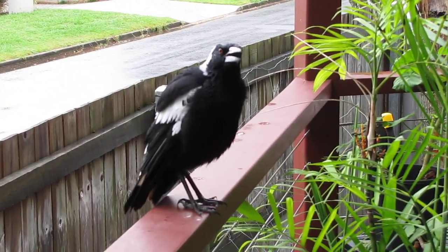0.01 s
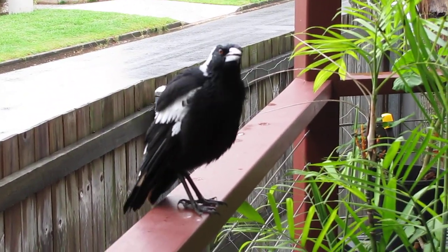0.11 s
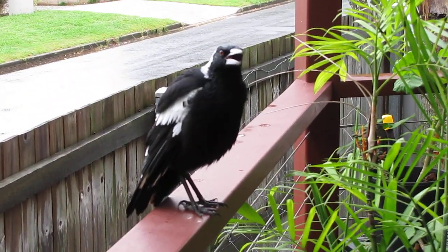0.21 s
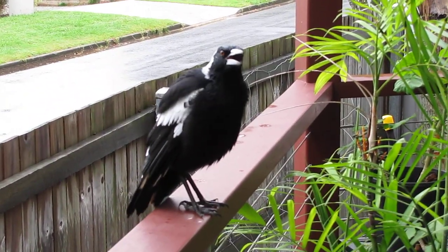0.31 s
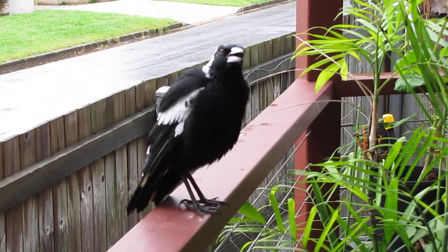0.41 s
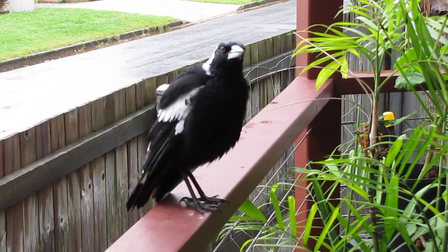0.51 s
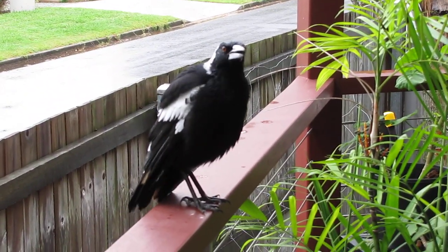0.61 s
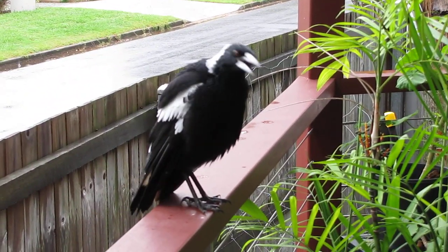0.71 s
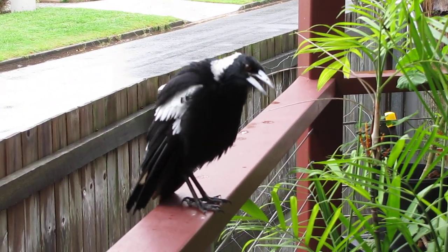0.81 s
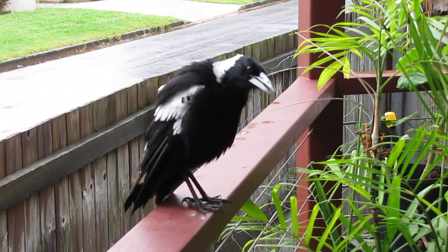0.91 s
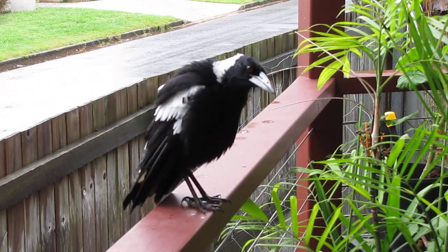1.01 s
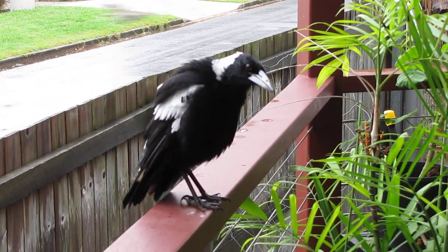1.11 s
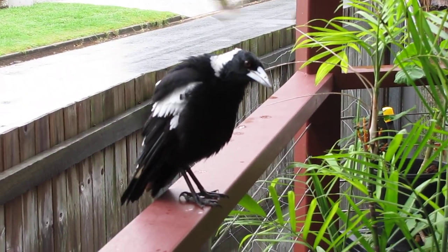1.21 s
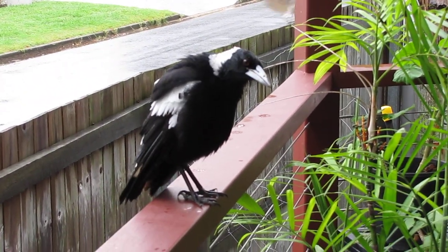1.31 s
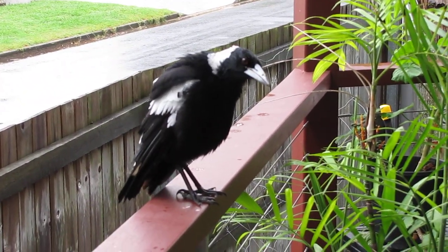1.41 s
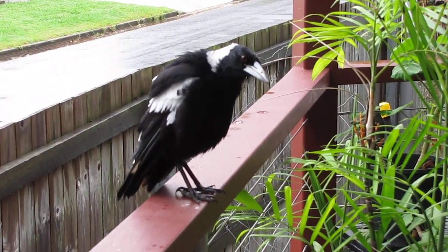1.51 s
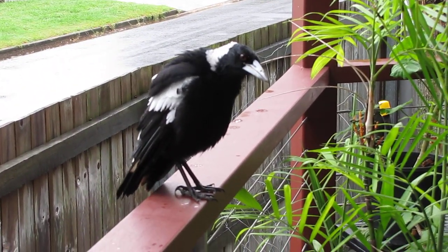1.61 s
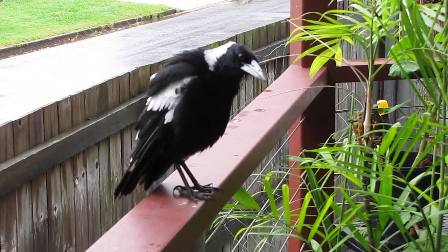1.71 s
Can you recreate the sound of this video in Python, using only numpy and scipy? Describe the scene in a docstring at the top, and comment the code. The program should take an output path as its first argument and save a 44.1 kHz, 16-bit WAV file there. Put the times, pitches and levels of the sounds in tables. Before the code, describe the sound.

Close stereo pickup outdoors on a rainy veranda: a magpie's squawk breaks off, two strong raspy falling cries follow, then small upward chirps through a nearly closed beak, while drips tick and tap and a faint wet hiss continues.

```python
"""A magpie on a veranda rail, close by. First a harsh squawk dies away: an unsteady voice in a narrow throat.
Then two loud falling calls, each opening with a creak; harmonics slide through throat resonances, with rasp.
Last come four soft rising chirps, coloured by the nearly closed beak. Drips, as decaying noise bursts,
tick and tap over the filtered-noise hush of a wet street; veranda and fence answer with echoes and a tail."""
import sys
import numpy as np
from scipy import signal
from scipy.fft import rfft, irfft, next_fast_len
from scipy.io import wavfile
from scipy.ndimage import map_coordinates

SR = 44100
rng = np.random.default_rng(int(sys.argv[2]) if len(sys.argv) > 2 else 0)


def inscribe(sig):
    """Save sig as 16-bit PCM at rate SR to the path in sys.argv[1].

    A 1-D sig is mono; a 2-D sig holds one channel per row.
    Samples are clipped to [-1, 1] before scaling.
    """
    pcm = np.round(np.clip(np.atleast_2d(sig).T, -1, 1) * 32767)
    wavfile.write(sys.argv[1], SR, pcm.astype(np.int16))


N = 79380
LEAD_IN = SR // 5  # samples computed before time 0, so that the squawk and its echoes already sound there
T = np.arange(-LEAD_IN, N) / SR  # s
TOP_HZ = 15750
ATTACK_S, RELEASE_S = 0.0014, 0.01
FLUTTER_HZ, OWN_FLUTTER_DB = 219.9, 4  # rate and depth of the voice's level flutter


def amp(db):
    """Level definition: decibels to an amplitude gain."""
    return 10 ** (np.asarray(db) / 20)


def unit(x):
    """Normalisation: scaled to rms 1."""
    return x / np.sqrt(np.mean(x ** 2) + 1e-20)


def along(points, hz):
    """Logarithmic frequency scale: (Hz, value) points joined by lines."""
    f, v = np.transpose(points)
    return np.interp(np.log(hz + 1), np.log(f + 1), v)


def curves(rows):
    """Linear interpolation: one value per sample for each column after the time."""
    s, *columns = np.transpose(rows)
    return [np.interp(T, s, column) for column in columns]


def wobble(rate):
    """Band-limited fluctuation: a smooth random curve with rate knots a second."""
    knots = rng.standard_normal(len(T) // 8)
    return map_coordinates(knots, [(T - T[0]) * rate], mode="wrap")


def filtered(x, response):
    """Linear filtering: the spectrum times a response of frequency."""
    m = next_fast_len(len(T) + SR // 4)
    hz = np.fft.rfftfreq(m, 1 / SR)
    return irfft(rfft(x, m) * response(hz), m)[..., :len(T)]


def noise(colour):
    """Spectral shaping: coloured noise of rms 1."""
    return unit(filtered(rng.standard_normal(len(T)), lambda hz: amp(along(colour, hz))))


def gate(start, end, release_s=RELEASE_S, attack_s=ATTACK_S):
    """Amplitude envelope: Gaussian flanks before the start and after the end, steady between."""
    before = np.maximum(start - T, 0) / attack_s
    after = np.maximum(T - end, 0) / release_s
    return np.exp(-before ** 2 - after ** 2)


def partial(pitch, k):
    """Phase as the integral of frequency: harmonic k of a moving pitch, rms 1, silent above SR / 2."""
    phase = 2 * np.pi * k * np.cumsum(pitch) / SR
    return np.sqrt(2) * np.sin(phase) * (k * pitch < SR / 2)


def overtones(pitch, throat, flutter_db, orders):
    """Source-filter principle: harmonics slide through fixed resonances, at rms 1 before each flutters."""
    gains = np.array([amp(along(throat, k * pitch)) for k in orders])
    gains /= np.linalg.norm(gains, axis=0)
    return sum(g * amp(flutter_db * wobble(FLUTTER_HZ)) * partial(pitch, k) for g, k in zip(gains, orders))


# the two falling calls, before jitter and flutter:
# t/s, f/Hz, fundamental level/dB, second harmonic level/dB, higher overtones level/dB
CALL_CURVES = [
    [(0.172, 2425, -29, -47, -47), (0.18, 2432, -24, -36.5, -42), (0.196, 2362, -26.5, -31.5, -50),
     (0.204, 2404, -25.5, -35.5, -40), (0.238, 2400, -15, -24, -41.5), (0.258, 2325, -13.5, -20, -31.5),
     (0.284, 2304, -10.5, -23, -33.5), (0.322, 2247, -10, -33, -28.5), (0.36, 2140, -14, -27.5, -27),
     (0.376, 2107, -24, -44, -22), (0.39, 2024, -11, -40, -19), (0.42, 1950, -12, -35.5, -27.5),
     (0.43, 1919, -17.5, -53, -32)],
    [(0.628, 2342, -44, -45, -55), (0.632, 2381, -31.5, -47, -56), (0.672, 2322, -22, -28.5, -41.5),
     (0.736, 2243, -14, -32.5, -32.5), (0.752, 2226, -12, -40.5, -35.5), (0.762, 2163, -14, -29.5, -25.5),
     (0.8, 2110, -19.5, -27, -29.5), (0.828, 1981, -18.5, -41, -26), (0.846, 2018, -14.5, -34.5, -28),
     (0.88, 1977, -16.5, -44, -26), (0.888, 1961, -7.5, -38, -30), (0.9, 1924, -10, -36.5, -25),
     (0.912, 1855, -20.5, -40, -31)],
]
# state of the voice: t/s, breathy rasp level/dB, roughness/(0-1)
VOICE = [(.17, -50, 0.15), (.21, -43.5, 0.37), (.245, -47, 0.09), (.31, -42.5, 0.13), (.335, -52, 0.06),
         (.37, -44.5, 0.38), (.43, -60, 0.2), (.63, -59.5, 0.42), (.655, -42.5, 0.28), (.69, -59.5, 0.2),
         (.75, -50, 0.2), (.765, -47.5, 0.39), (.80, -52, 0.32), (.82, -48.5, 0.64), (.85, -50, 0.48),
         (.885, -52, 0), (.915, -71, 0.26)]
# throat and open beak, as they colour the higher overtones: f/Hz, relative level/dB
THROAT = [(5300, 4), (5700, 6.5), (6100, 6), (6500, 1), (7000, -3.5), (7600, -9.5), (8500, -8.5),
          (9500, -16.5), (11000, -14), (12000, -15.5), (13500, -20.5), (15500, -29)]
# colour of the breath noise: f/Hz, relative level/dB
RASP = [(300, -34), (1300, 2.5), (2500, 1.5), (3500, -7), (4600, -3), (5100, -11), (5900, 10.5),
        (7000, -6.5), (8500, -3), (11000, -11.5), (15500, -23)]
JITTER, SHIMMER_DB = 0.0201, 4  # pitch fraction and level swing at roughness 1
RASP_FLUTTER_DB, RASP_FLUTTER_HZ = 2, 120.85
CALL_CUT_S = 0.0045


def falling_calls():
    """Source-filter principle: a whistle slides down past throat resonances; rasp is modulated at its pitch."""
    rasp_db, rough = curves(VOICE)
    out = 0
    for rows in CALL_CURVES:
        pitch, tone_db, second_db, over_db = curves(rows)
        pitch = pitch * (1 + JITTER * rough * wobble(2 * FLUTTER_HZ))
        flutter_db = OWN_FLUTTER_DB * abs(rough) ** 0.29
        tone = partial(pitch, 1)
        # slightly mistuned second harmonic
        second = amp(second_db + flutter_db * wobble(FLUTTER_HZ)) * partial(pitch, 2.001)
        higher = amp(over_db) * overtones(pitch, THROAT, flutter_db, range(3, 9))
        voice = amp(tone_db) * tone + second + higher
        shimmer = amp(SHIMMER_DB * rough * wobble(FLUTTER_HZ))
        rasp = amp(rasp_db + RASP_FLUTTER_DB * wobble(RASP_FLUTTER_HZ)) * noise(RASP) * (1 + 0.66 * tone)
        out = out + gate(rows[0][0], rows[-1][0], CALL_CUT_S) * (voice * shimmer + rasp)
    return out


# the creak before each call, before jitter:
# start t/s, end t/s, first f/Hz, last f/Hz, level/dB, roughness/(0-1)
CREAKS = [(.152, 0.169, 1100, 959, -30.5, 0.63), (0.596, 0.621, 1068, 935, -39.5, .4)]
# throat during the creak: f/Hz, relative level/dB
CREAK_THROAT = [(900, -41), (1100, -29), (1400, -14), (1750, -12), (2200, 4), (2700, 18.5), (3200, -4),
                (4000, -8), (5000, -17.5), (5900, 2.5), (7200, -18), (10000, -29), (15000, -40)]
CREAK_JITTER, CREAK_FLUTTER_HZ = 0.0694, 707.7  # pitch fraction at roughness 1, and its rate
CREAK_RASP_DB = -14  # relative to the creak


def creaks():
    """Period perturbation: the voice about an octave lower, its period unsteady, its pitch sagging ever faster."""
    out = 0
    for start, end, first_hz, last_hz, db, rough in CREAKS:
        progress = np.clip((T - start) / (end - start), 0, 1)
        pitch = first_hz + (last_hz - first_hz) * progress ** 2
        pitch = pitch * (1 + CREAK_JITTER * rough * wobble(CREAK_FLUTTER_HZ))
        voice = overtones(pitch, CREAK_THROAT, OWN_FLUTTER_DB * rough, range(1, 14))
        rasp = amp(CREAK_RASP_DB) * noise(RASP)
        out = out + amp(db) * gate(start, end, attack_s=.007) * (voice + rasp)
    return out


# decay of the harsh squawk: t/s, level/dB
SQUAWK = [(-.15, -1), (-.04, -12.5), (.008, -26), (.016, -39), (.03, -50), (.06, -92)]
# narrow throat resonance: f/Hz, relative level/dB
SQUAWK_THROAT = [(1000, -21), (1400, -8), (1900, -12.5), (2400, 2), (2750, 4), (3200, -11), (4000, -17),
                 (4900, -16), (5700, -8), (7200, -18), (10000, -30.5), (15000, -34)]
SQUAWK_HZ, SQUAWK_JITTER = 1340, .085  # mean pitch, and its wobble as a fraction
SQUAWK_RASP_DB = -17.5  # relative to the squawk


def squawk():
    """Frequency modulation by noise: a low, torn note that breaks off."""
    level_db, = curves(SQUAWK)
    pitch = SQUAWK_HZ * (1 + SQUAWK_JITTER * wobble(CREAK_FLUTTER_HZ))
    voice = overtones(pitch, SQUAWK_THROAT, 2.7, range(1, 11))
    return amp(level_db) * (voice + amp(SQUAWK_RASP_DB) * noise(RASP))


# soft rising chirps: start of the rise t/s, length/s, pitch approached f/Hz, time constant of the rise/s,
# level before the beak's colour/dB, overtones relative level/dB, leading note relative level/dB,
# catch after the start t/s
CHIRPS = [(1.221, 0.04, 3720, 0.019, -39.5, -7, -19, .016), (1.344, 0.051, 4360, .026, -43, -4, -11, 0.013),
          (1.481, 0.055, 3820, 0.019, -40.5, -10.5, -14, 0.029),
          (1.645, 0.049, 3720, .015, -38.5, -11.5, -9.5, 0.024)]
# uneven colour of the nearly closed beak: f/Hz, relative level/dB
CHIRP_BEAK = [(1600, -3.5), (2050, -7.5), (2400, 1), (2750, -2), (3100, 3), (3400, -5.5), (3600, -3),
              (4000, 2.5), (4700, -12), (5800, 9.5), (6600, -4), (7700, -0.5), (9000, -7), (15000, -12.5)]
CHIRP_LOW_HZ, CHIRP_SLOPE_DB = 1560, -4  # pitch where the rise starts; slope per overtone
CHIRP_FLUTTER_DB, CHIRP_JITTER = 5, 0.0091  # flutter of the second harmonic; pitch fraction
LEAD_S, LEAD_FALL_HZ_PER_S, LEAD_OVERTONES_DB = 0.018, 19000, -1.5  # falling note ahead of the rise
CATCH_DB, CATCH_S = 9, 0.0049  # the voice catches once in each chirp: depth, Gaussian width


def chirps():
    """Exponential glide: after a faint fall, pitch sweeps up through beak resonances, catches and levels off."""
    out = 0
    for start, length, top_hz, rise_s, db, over_db, lead_db, catch in CHIRPS:
        rise = 1 - np.exp(-np.maximum(T - start, 0) / rise_s)
        pitch = CHIRP_LOW_HZ + (top_hz - CHIRP_LOW_HZ) * rise
        pitch = pitch + LEAD_FALL_HZ_PER_S * np.clip(start - T, 0, LEAD_S)
        shaky = pitch * (1 + CHIRP_JITTER * wobble(2 * FLUTTER_HZ))
        harmonics = []
        for k in range(1, 6):
            flutter_db = CHIRP_FLUTTER_DB * np.sqrt(k / 2) * wobble(FLUTTER_HZ)
            harmonics.append(amp(along(CHIRP_BEAK, k * pitch) + flutter_db) * partial(shaky, k))
        tone, *above = harmonics
        upper = sum(amp(CHIRP_SLOPE_DB * k) * p for k, p in enumerate(above))
        sweep = gate(start + ATTACK_S, start + length - RELEASE_S) * (tone + amp(over_db) * rise ** 2 * upper)
        lead_gate = gate(start - LEAD_S + ATTACK_S, start - ATTACK_S)
        lead = amp(lead_db) * lead_gate * (tone + amp(LEAD_OVERTONES_DB) * above[0])
        catch_db = CATCH_DB * np.exp(-((T - start - catch) / CATCH_S) ** 2)
        out = out + amp(db - catch_db) * (sweep + lead)
    return out


# left-right level difference of the bird: f/Hz, level/dB
BEAK_PAN = [(1900, -.5), (2050, -1), (2150, -4.5), (2400, -2.5), (3500, -2), (4600, 4), (6200, 1.4),
            (9000, 1), (14000, -1)]
# phase by which left leads: f/Hz, phase/rad
BEAK_PHASE = [(2700, 0), (3300, -0.56), (4300, 1), (6100, -1.26), (7800, 0.92), (11000, 0.58), (15000, .3)]


def at_both_ears(x):
    """Interaural differences: level and phase differ between left and right with frequency."""
    sides = np.array([[.5], [-.5]])
    return filtered(x, lambda hz: amp(sides * along(BEAK_PAN, hz)) * np.exp(1j * sides * along(BEAK_PHASE, hz)))


def drips(rows, colour, t60):
    """Impulsive excitation: sudden noise bursts that decay exponentially, 60 dB in t60 seconds."""
    return noise(colour) * sum(amp(db - 60 * np.maximum(T - s, 0) / t60) * (T >= s) for s, db in rows)


# sharp drips on leaves: t/s, level/dB
TICKS = [(1.309, -43.5), (1.449, -43.5)]
# their colour: f/Hz, relative level/dB
TICK_COLOUR = [(500, -5), (3000, 3.5), (7000, -2), (15000, -15)]
# duller taps on wood: t/s, level/dB
TAPS = [(.887, -41), (1.001, -42.5), (1.026, -50), (1.409, -43.5), (1.729, -41), (1.741, -47)]
# their colour: f/Hz, relative level/dB
TAP_COLOUR = [(150, 2.5), (400, -11.5), (600, 5), (1000, -5.5), (1500, 2.5), (3000, -4), (6000, -13),
              (15000, -37)]


def ticks_and_taps():
    """Impact spectra: leaf drips are bright and short, taps on wood duller and longer."""
    return drips(TICKS, TICK_COLOUR, t60=0.065) + drips(TAPS, TAP_COLOUR, t60=0.089)


# first echoes off post and wall: left delay t/s, right delay t/s, level/dB
WALLS = [(0.016, .0172, -15.5), (.031, .0295, -23)]


def walls(x):
    """Specular reflection: single delayed echoes from the nearest surfaces."""
    def response(hz):
        return sum(amp(db) * np.exp(-2j * np.pi * np.outer([left, right], hz)) for left, right, db in WALLS)
    return filtered(x, response)


# reverberation time of veranda and fence: f/Hz, t60/s
VERANDA = [(300, 0.54), (2000, 0.36), (6000, 0.31), (12000, 0.3)]
VERANDA_DB, VERANDA_DELAY_S, VERANDA_WIDTH = -17, .018, 0.64  # width: side relative to mid


def veranda(x):
    """Diffuse reverberation: roof and fence answer with decaying noise whose treble dies first."""
    hz, t, z = signal.stft(rng.standard_normal((2, SR // 2)), SR, nperseg=256)
    decay = amp(-60 * t / along(VERANDA, hz)[:, None])
    mid, side = signal.istft(z * decay, SR, nperseg=256)[1]
    tail = np.array([mid + VERANDA_WIDTH * side, mid - VERANDA_WIDTH * side]) / np.linalg.norm(mid)
    delayed = np.pad(x, (int(VERANDA_DELAY_S * SR), 0))
    return amp(VERANDA_DB) * signal.fftconvolve(delayed[None], tail, axes=1)[:, :len(T)]


FAR_DRIPS_PER_S, FAR_DRIP_DB, FAR_DRIP_SPREAD_DB = 22, -56.5, 2  # spread: either way


def far_drips():
    """Random arrivals: faint drips at uniformly drawn moments and levels."""
    draws = rng.random((int(FAR_DRIPS_PER_S * N / SR), 2))
    rows = [(u * N / SR, FAR_DRIP_DB + FAR_DRIP_SPREAD_DB * (2 * v - 1)) for u, v in draws]
    return drips(rows, TICK_COLOUR, t60=0.021)


# spectral density of the street: f/Hz, relative level per Hz/dB
STREET = [(25, -9.5), (40, -8), (70, 0), (100, -6), (160, -4), (250, -8.5), (400, -12.5), (700, -8.5),
          (1500, -7), (2500, -8), (3500, -15), (5300, -15.5), (7300, -22), (11000, -28.5), (15500, -32)]
# background: t/s, low hum level/dB, wet hiss level/dB
STREET_LEVEL = [(0, -54.5, -53.5), (.55, -55, -56), (1.15, -55, -54.5), (1.3, -55, -50),
                (1.45, -54.5, -50.5), (1.6, -55, -51.5), (1.8, -48, -49)]
# left-right likeness: f/Hz, correlation/(0-1)
ALIKE = [(30, 0.98), (100, 0.99), (250, 0.96), (600, 0.97), (3000, 0.35), (12000, 0.23)]
SPLIT_HZ = 375  # between hum and hiss
HISS_WAVER_DB = .8


def street():
    """Interaural coherence: shaped noise, its low hum nearly alike in both ears, its wet hiss less so."""
    hum_db, hiss_db = curves(STREET_LEVEL)

    def mid_side(hz):
        angle = np.arccos(np.clip(along(ALIKE, hz), -1, 1)) / 2
        return amp(along(STREET, hz)) * np.array([np.cos(angle), np.sin(angle)])
    mid, side = filtered(rng.standard_normal((2, len(T))), mid_side)
    air = np.array([mid + side, mid - side])
    hum = filtered(air, lambda hz: 1 / (1 + (hz / SPLIT_HZ) ** 4))
    hiss = unit(air - hum)
    return amp(hum_db) * unit(hum) + amp(hiss_db + HISS_WAVER_DB * wobble(26.1)) * hiss


CHIRP_ECHO_DB = 7.5  # the bird has turned aside, so more of its sound returns as echo


def scene():
    """Superposition: the bird and the drips, their echoes, and the street."""
    loud = squawk() + creaks() + falling_calls()
    soft = chirps()
    wet = ticks_and_taps()
    direct = at_both_ears(loud + soft)
    sent = loud + amp(CHIRP_ECHO_DB) * soft + wet
    echoes = walls(sent) + veranda(sent)
    return (direct + wet + echoes + street() + far_drips())[:, LEAD_IN:]


def record(dry):
    """Band limitation: nothing is kept from TOP_HZ upwards."""
    return filtered(dry, lambda hz: hz < TOP_HZ)[:, :N]


dry = scene()
out = record(dry)
inscribe(out)
```